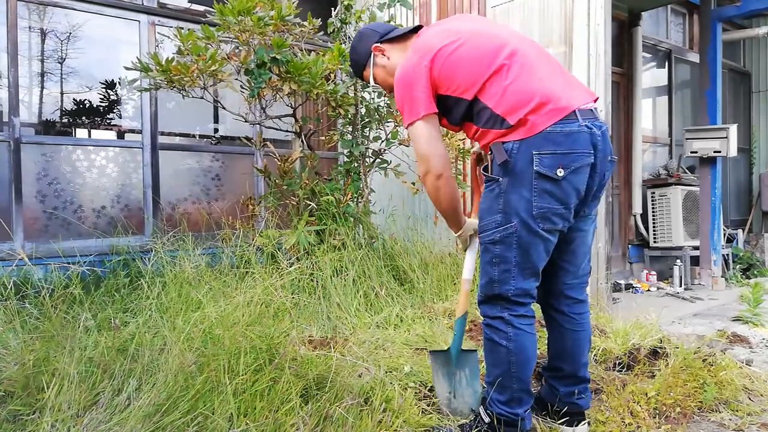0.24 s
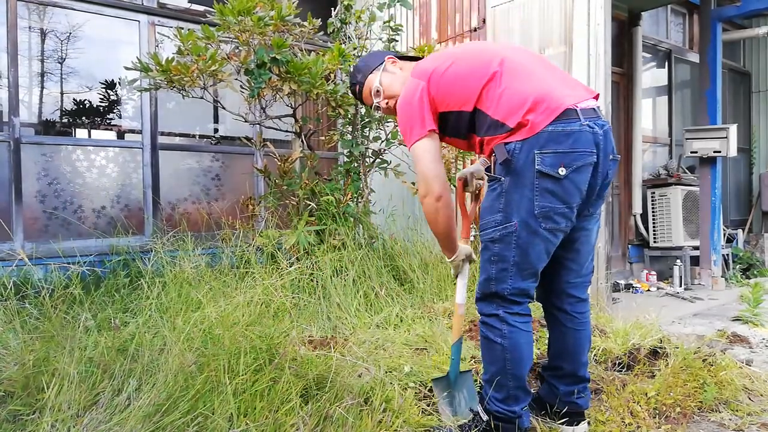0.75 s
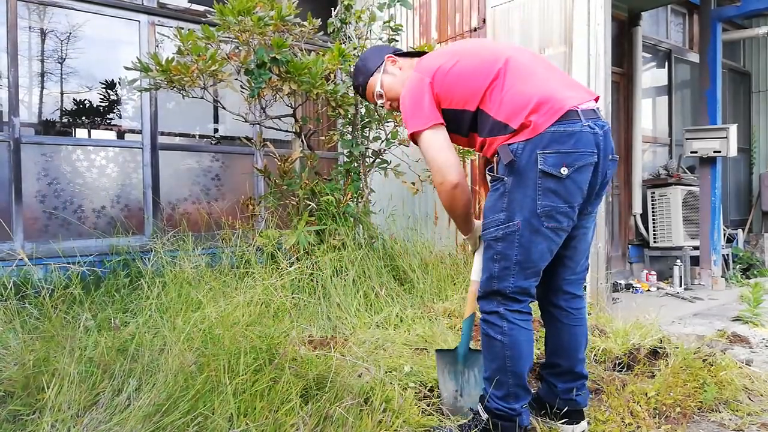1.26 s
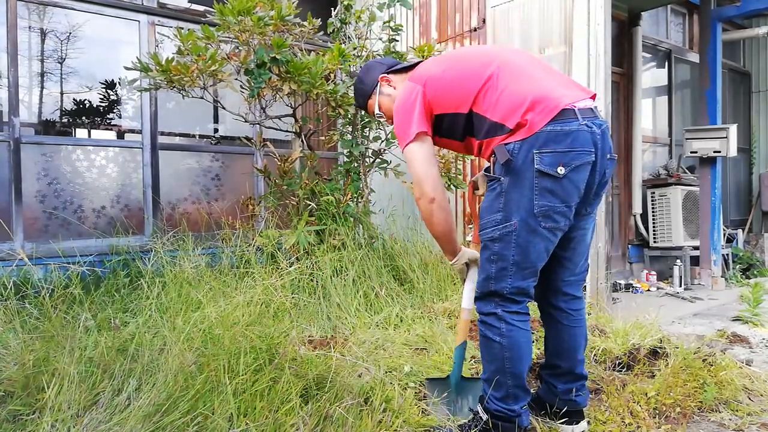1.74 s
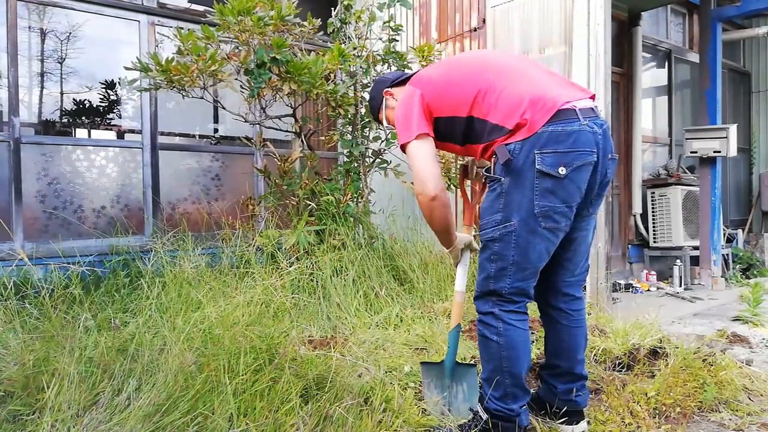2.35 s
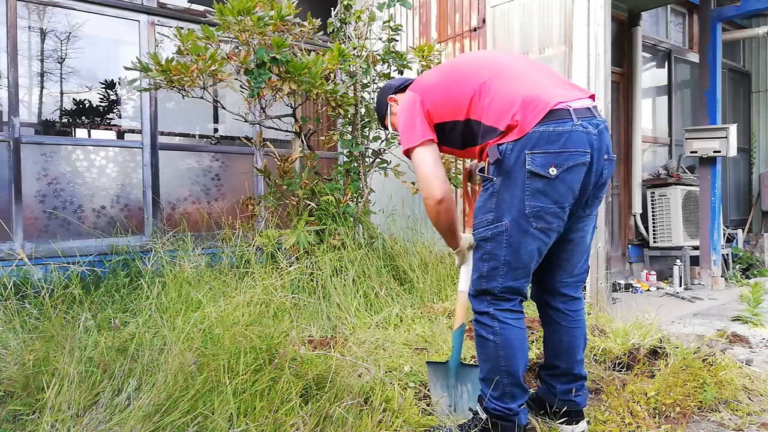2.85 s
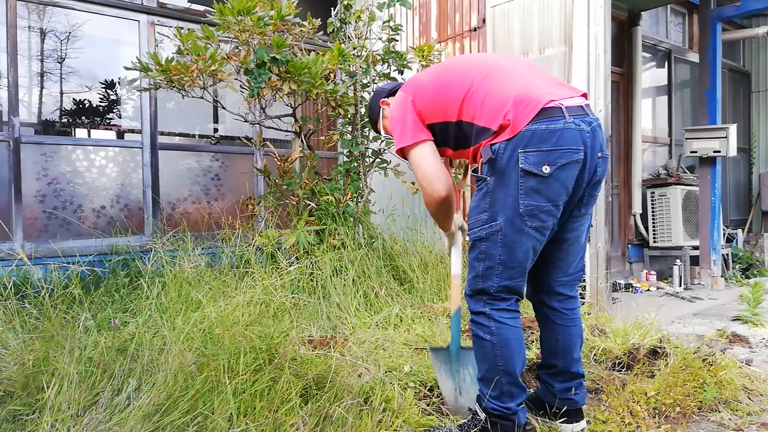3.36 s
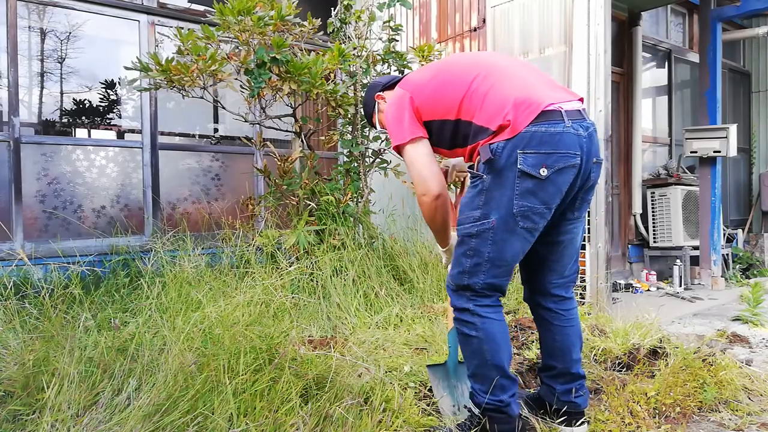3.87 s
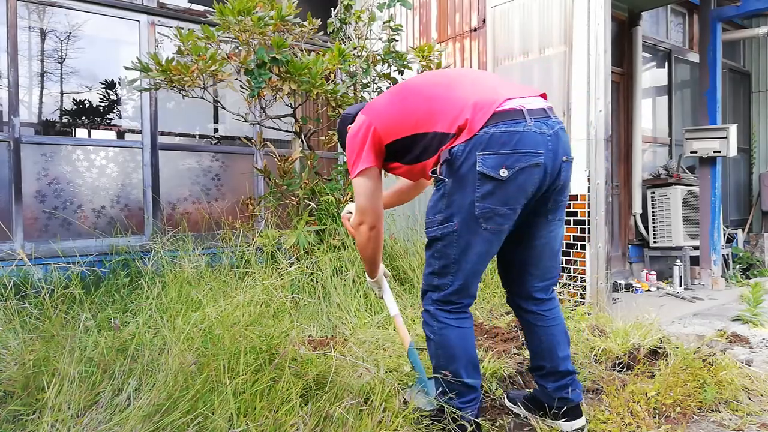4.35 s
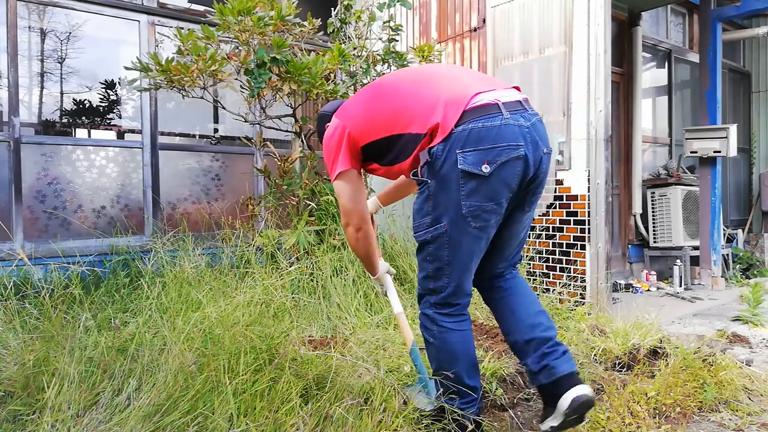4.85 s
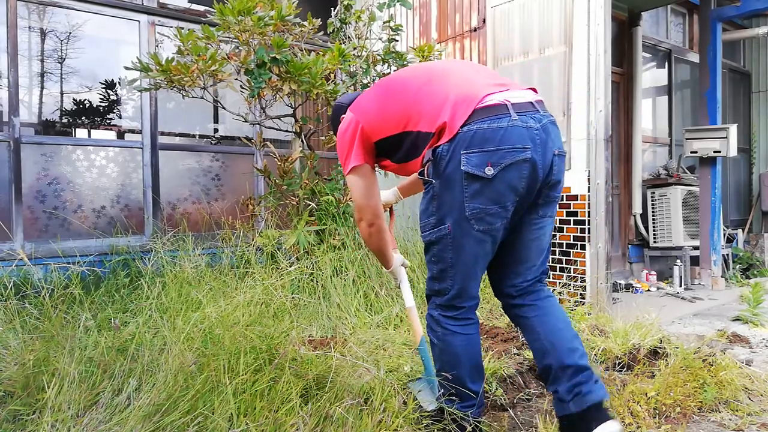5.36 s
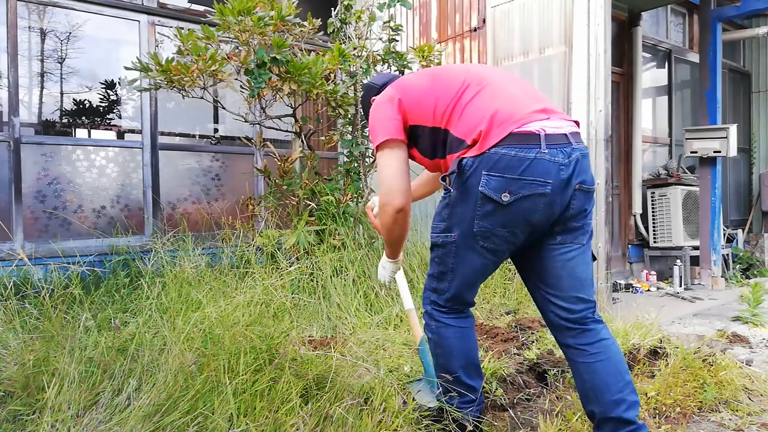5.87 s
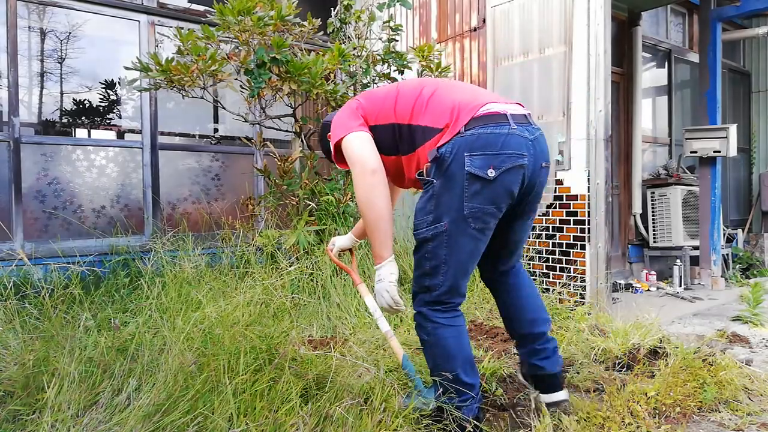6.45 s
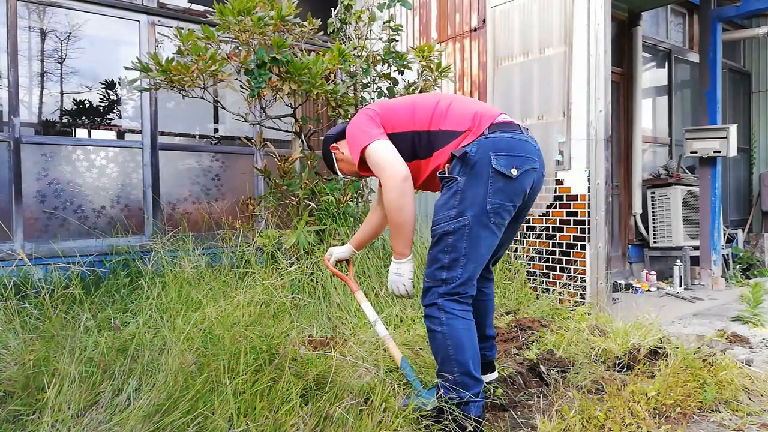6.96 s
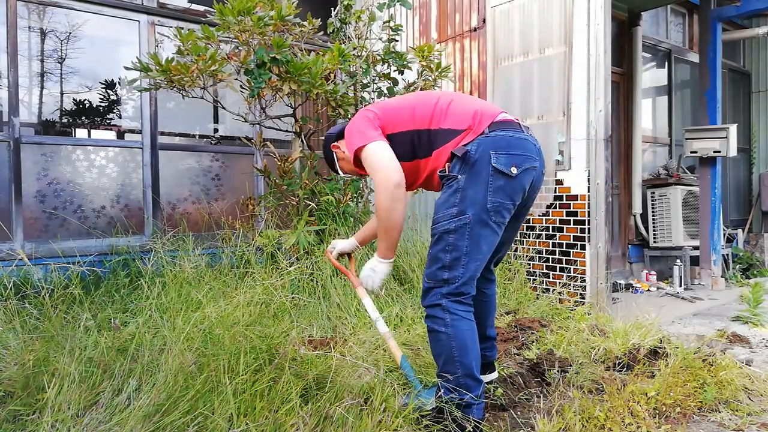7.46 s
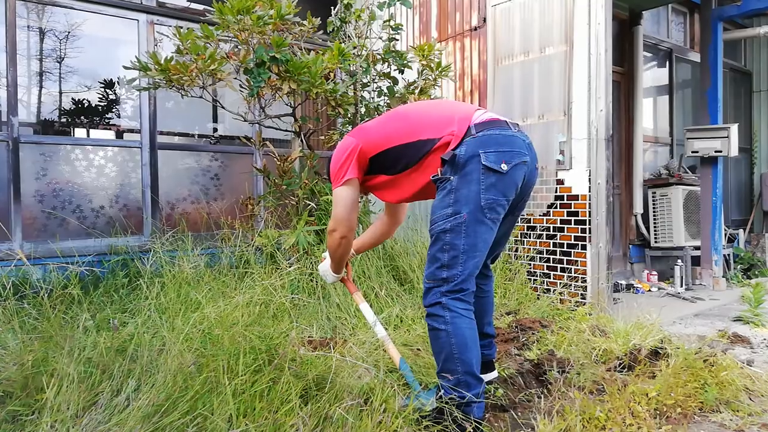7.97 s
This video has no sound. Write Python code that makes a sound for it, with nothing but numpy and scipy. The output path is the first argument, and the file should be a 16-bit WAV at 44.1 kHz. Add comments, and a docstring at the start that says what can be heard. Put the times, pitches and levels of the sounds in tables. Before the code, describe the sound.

A steel shovel digs in stony garden soil close by, with a short echo from house walls. It opens with a sharp clank, followed by a cluster of clinks at 0.6 seconds and light pebble ticks. A gritty scrape with strikes comes at 1.5, another clink at 2.2, and loud, briefly ringing clanks at 2.9 and 3.4. From 4 to about 7 seconds, grass and trousers rustle softly as feet shift on loose soil. A boot stamps the blade in at 5.1 and 5.5, each a dull thud with a crunch, and a rubber sole slips with a short rasp at 5.8. The wooden shaft knocks quietly now and then. Another sharp clank lands at 6.8, and a lighter scraping clink at 7.8. Throughout, crickets chirp quietly, one nearer and others distant, over faint outdoor air and a low machine hum.

```python
"""A steel shovel clanks and scrapes in stony garden soil: jabbed, levered, then stamped in twice by a boot.
The edge grinds on stones and the blade's modes ring briefly; the wooden shaft knocks dully.
Grass and trousers rustle, a rubber sole slips, and house walls answer with a short echo.
Crickets chirp with their wings over outdoor air and a low machine hum."""
import sys
import numpy as np
from scipy import signal
from scipy.fft import rfft, irfft, next_fast_len
from scipy.io import wavfile
from scipy.ndimage import map_coordinates

SR = 44100
rng = np.random.default_rng(int(sys.argv[2]) if len(sys.argv) > 2 else 0)


def to_wav(sig):
    """Store sig (one row per channel, or 1-D mono) as 16-bit WAV at the path in sys.argv[1].

    Samples outside -1..1 are clipped; the rate is SR.
    """
    pcm = np.clip(np.atleast_2d(sig), -1, 1) * 32767
    pcm = np.round(pcm).astype(np.int16)
    wavfile.write(sys.argv[1], SR, pcm.T)  # frames by channels


N = 362061

# Spectrum of grit on steel. Each row: frequency in Hz, level in dB.
GRIT_SPECTRUM = [(200, -21), (400, -14), (1000, -17), (2500, -7), (4500, -5.5), (6200, -9), (8600, -6.5),
                 (9900, -4), (10700, 4), (11600, -6), (12500, -9.5), (16000, -25)]
# Spectrum of crunching soil. Each row: frequency in Hz, level in dB.
SOIL_SPECTRUM = [(100, -41.5), (400, 3), (800, -2.5), (1400, -6), (2100, -9.5), (3500, -17.5),
                 (7000, -13.5), (16000, -61.5)]
# Boot on the blade's step. Each row: start in seconds, level in dB, relative soil crunch in dB.
BOOT_STAMPS = [(5.1387, -10, 6.5), (5.464, -7.5, 14)]


def amp(db):
    """Decibels to gain."""
    return 10 ** (np.asarray(db) / 20)


def unit_rms(x):
    """Scale to rms 1."""
    return x / np.sqrt(np.mean(x ** 2) + 1e-20)


def curve_at(points, hz):
    """Interpolate (Hz, value) points on a log axis."""
    point_hz, values = np.transpose(points)
    return np.interp(np.log(hz + 1), np.log(point_hz + 1), values)


def wobble(rate_hz):
    """Smooth random curve, rate_hz knots a second."""
    knots = rng.standard_normal(int(N * rate_hz / SR) + 4)
    return map_coordinates(knots, [np.arange(N) * rate_hz / SR])


def swell(peak_s, rise_s, fall_s, roundness=1):
    """Gain of 1 at peak_s, 20 dB lower rise_s before and fall_s after."""
    t = np.arange(N) / SR - peak_s
    return amp(-20 * np.minimum(np.maximum(-t / rise_s, t / fall_s), 10) ** roundness)


def damped(hz, t60_s, attack_s):
    """One decaying sine mode."""
    t = np.arange(SR // 2) / SR
    return amp(-60 * t / t60_s) * (1 - np.exp(-t / attack_s)) * np.sin(2 * np.pi * hz * t)


def add(track, start_s, sound):
    """Mix a sound into a track in place."""
    start = max(round(start_s * SR), 0)
    part = sound[..., :track.shape[-1] - start]
    track[..., start:start + part.shape[-1]] += part


def filtered(x, response):
    """FFT filter with gain response(Hz)."""
    n = x.shape[-1]
    size = next_fast_len(n + 8192)
    return irfft(rfft(x, size) * response(np.fft.rfftfreq(size, 1 / SR)), size)[..., :n]


def coloured(x, response_db, size=2048):
    """Minimum-phase filter with level response_db(Hz)."""
    cepstrum = irfft(np.log(amp(response_db(np.fft.rfftfreq(size, 1 / SR)))))
    cepstrum[1:size // 2] *= 2
    cepstrum[size // 2 + 1:] = 0
    impulse = irfft(np.exp(rfft(cepstrum)))
    return signal.fftconvolve(x, impulse[None], axes=1)[:, :x.shape[-1]]


def spread(pair):
    """Two unrelated signals become left and right, nearly mono in the bass."""
    # Stereo image. Each row: frequency in Hz, left-right correlation.
    correlation = [(150, 0.93), (300, 0.56), (500, 0.077), (1200, 0.083), (3000, 0.17), (12000, 0.12)]
    angle = lambda hz: np.arccos(np.clip(curve_at(correlation, hz), -1, 1)) / 2
    mid, side = filtered(pair, lambda hz: np.array([np.cos(angle(hz)), np.sin(angle(hz))]))
    return np.array([mid + side, mid - side])


def off_centre(x, lag_s=0.00003):
    """A source slightly to the right arrives later on the left."""
    return filtered(x, lambda hz: np.exp(-2j * np.pi * lag_s * np.outer([0.5, -0.5], hz)))


def grains(n, rate_hz, scatter_db):
    """Stereo friction noise: tiny slips of random size, rms 1."""
    knots = np.minimum(rng.standard_normal(int(n * rate_hz / SR) + 2), 2)
    sizes = amp(scatter_db * np.interp(np.arange(n) * rate_hz / SR, np.arange(len(knots)), knots))
    return unit_rms(spread(sizes * rng.standard_normal((2, n))))


def rush(spectrum, rate_hz, scatter_db):
    """Scene-long grainy noise with a (Hz, dB) spectrum, rms 1."""
    return unit_rms(filtered(grains(N, rate_hz, scatter_db), lambda hz: amp(curve_at(spectrum, hz))))


def crackle(rate_hz=70, scatter_db=4, t60_s=0.0065):
    """Sparse ticks of loose grit, rms 1."""
    ticks = (rng.random(N) < rate_hz / SR) * amp(scatter_db * np.minimum(rng.standard_normal(N), 1.5))
    t = np.arange(SR // 100) / SR
    envelope = signal.fftconvolve(ticks, amp(-60 * t / t60_s))[:N]
    bursts = envelope * spread(rng.standard_normal((2, N)))
    return unit_rms(filtered(bursts, lambda hz: amp(curve_at(GRIT_SPECTRUM, hz))))


def grind(rise_s, crumble_db, crumble_t60_s):
    """Contact force of unit energy: a burst of slips, then crumbling soil."""
    t = np.arange(SR // 2) / SR
    progress = t / rise_s
    burst = progress ** 2 * np.exp(2 - 2 * progress)
    crumble = amp(crumble_db - 60 * t / crumble_t60_s) * np.minimum(progress, 1)
    force = (burst + crumble) * grains(len(t), rate_hz=1300, scatter_db=4.5)
    return force / np.linalg.norm(force, axis=1, keepdims=True)


def wall_echo(x, wet_db, build_s=0.0028, late_db=-27, late_t60_s=0.66):
    """x plus the walls' answer: a short dense echo and a faint longer one."""
    # Decay of the short echo. Each row: frequency in Hz, t60 in seconds.
    early_t60 = [(150, 0.1), (500, 0.21), (2000, 0.23), (6000, 0.24), (11000, 0.14), (16000, 0.07)]
    hz, t, noise = signal.stft(spread(rng.standard_normal((2, SR // 2))), SR, nperseg=256)
    decay = amp(-60 * t / curve_at(early_t60, hz)[:, None]) + amp(late_db - 60 * t / late_t60_s)
    tail = signal.istft(noise * decay * (1 - np.exp(-t / build_s)), SR, nperseg=256)[1]
    tail *= amp(wet_db) / np.linalg.norm(tail[0])
    return x + signal.fftconvolve(x, tail, axes=1)[:, :x.shape[1]]


def outdoor_air():
    """Faint, bass-heavy noise."""
    # Air spectrum. Each row: frequency in Hz, level in dB.
    spectrum = [(12, -33), (20, -3), (107, -1), (248, -9.5), (301, -15), (499, -22), (678, -20.5),
                (976, -24.5), (1220, -23.5), (4060, -31), (4670, -28), (5850, -34.5), (10800, -32.5),
                (14700, -40), (16000, -49)]
    return amp(-54) * rush(spectrum, rate_hz=14, scatter_db=1.5)


def machine_hum(low_db=-59, swell_s=0.12):
    """Four wavering hum lines; the low pair swells briefly, the upper pair drifts in level."""
    # Hum lines. Each row: frequency in Hz, relative level in dB.
    partials = [(91, 1), (127, -8.5), (184, 1.5), (252, -9)]
    # Swells of the low pair. Each row: peak time in seconds, level in dB.
    low_swells = [(5.91, -50), (6.35, -56)]
    # Envelope of the upper pair. Each row: time in seconds, level in dB.
    upper_levels = [(0, -60), (.5, -56.5), (.8, -68.5), (4, -64.5), (4.5, -59), (5.1, -64.5), (6.35, -54),
                    (7.2, -66.5), (8.2, -64.5)]
    t = np.arange(N) / SR
    low = amp(low_db) + sum(amp(db) * swell(s, swell_s, swell_s, roundness=2) for s, db in low_swells)
    upper = amp(np.interp(t, *np.transpose(upper_levels)))
    lines = [amp(db + 2 * wobble(1.2)) * np.sin(2 * np.pi * hz * t + 0.8 * wobble(4.9))
             for hz, db in partials]
    return amp(2) * (low * (lines[0] + lines[1]) + upper * (lines[2] + lines[3]))


def trill_band(trills, hz, width_hz, stroke_hz, ramp_s=0.0067):
    """Distant trills, blurred into a narrow pulsing band of noise."""
    t = np.arange(N) / SR
    gate = sum(amp(db) * np.clip(np.minimum(t - start_s, end_s - t) / ramp_s, 0, 1)
               for start_s, end_s, db in trills)
    strokes = 1 + 0.64 * np.sin(2 * np.pi * stroke_hz * t + 2.2 * wobble(6.5))
    band = filtered(rng.standard_normal((2, N)), lambda f: 1 / (1 + ((f - hz) / width_hz) ** 4))
    return wall_echo(gate * strokes * unit_rms(band), wet_db=-6.5)


def far_crickets(first_s=0.31, period_s=0.333, length_s=0.125, level_db=-68, rest_s=2.2, resume_s=3.2):
    """One cricket trills like clockwork, with one rest; a lower voice joins three times."""
    # Trills of the lower voice. Each row: start in seconds, end in seconds, level in dB.
    low_trills = [(.7, 1.12, -71.5), (4.3, 5.15, -68.5), (6.2, 6.3, -63)]
    starts_s = np.arange(first_s, N / SR, period_s)
    high_trills = [(s, s + length_s, level_db) for s in starts_s if not rest_s < s < resume_s]
    high = trill_band(high_trills, hz=4663, width_hz=150, stroke_hz=44)
    return high + trill_band(low_trills, hz=3650, width_hz=250, stroke_hz=26)


def near_cricket(hz=4600, pitch_drop=0.065, width_s=0.0025, stroke_hz=36):
    """Each wing stroke is a short, slightly rough falling note; strokes grow louder through a chirp."""
    # Each row: first and last stroke in seconds, level of the last in dB, growth in dB per second.
    chirps = [(0.502, 0.587, -39, 178), (2.473, 2.527, -43, 18), (2.779, 2.834, -45, 47),
              (3.326, 3.406, -47, 107), (5.024, 5.124, -43.5, 146), (6.673, 6.753, -45, 120),
              (7.955, 8.031, -41.5, 202)]
    out, t = np.zeros(N), np.arange(-SR // 50, SR // 50) / SR
    for first_s, last_s, last_db, db_per_s in chirps:
        for s in np.linspace(first_s, last_s, 1 + round((last_s - first_s) * stroke_hz)):
            roughness = 0.05 * np.cumsum(rng.standard_normal(len(t)))
            phase = 2 * np.pi * hz * (t - pitch_drop * t ** 2 / (8 * width_s)) + roughness
            note = np.exp(-0.5 * (t / width_s) ** 2) * (np.sin(phase) + amp(-17.5) * np.sin(2 * phase))
            start_s = s + t[0] + rng.normal(0, 0.00063)
            db = last_db - db_per_s * (last_s - s) + rng.normal(0, 1.9)
            add(out, start_s, amp(db) * note)
    return wall_echo(np.array([out, out]), wet_db=-12.5)


def leg_rustle(flutter_db=0.9, trouser_db=-34.5, trouser_s=0.026):
    """Legs brush grass while feet shift on loose soil; the trousers swish with each stamp."""
    # Each row: peak time in seconds, swish and soil crunch in dB, rise and fall in seconds.
    leg_moves = [(4.05, -38.5, -64.5, 0.13, .13), (4.13, -44.5, -54.5, 0.11, 0.03),
                 (4.3, -46, -57.5, 0.19, 0.075), (4.48, -57, -58.5, 0.15, 0.14),
                 (4.68, -63.5, -56, 0.061, 0.17), (4.88, -57, -68, .15, 0.14),
                 (5.23, -49.5, -76, 0.2, 0.15), (5.325, -56, -48, 0.01, 0.031),
                 (5.57, -52, -66, 0.21, 0.15), (5.74, -45.5, -60.5, 0.12, 0.11),
                 (6.14, -62.5, -56.5, 0.19, 0.27), (6.42, -44.5, -64.5, 0.15, 0.1),
                 (6.51, -53, -64.5, .05, 0.16), (6.72, -59.5, -58.5, 0.092, 0.069)]
    # Spectrum of grass and cloth. Each row: frequency in Hz, level in dB.
    swish_spectrum = [(1180, -35.5), (2000, -13), (2810, -23.5), (3400, -15), (6760, -14), (9330, -4.5),
                      (10700, -2.5), (12300, -5.5), (16000, -21)]
    swish = sum(amp(trouser_db) * swell(s, trouser_s, trouser_s) for s, _, _ in BOOT_STAMPS)
    crunch = np.zeros(N)
    for peak_s, swish_db, crunch_db, rise_s, fall_s in leg_moves:
        move = swell(peak_s, rise_s, fall_s, roundness=1.13)
        swish += amp(swish_db) * move
        crunch += amp(crunch_db) * move
    brushing = amp(flutter_db * wobble(45)) * swish * rush(swish_spectrum, rate_hz=610, scatter_db=3)
    soil = crunch * (amp(-3) * rush(SOIL_SPECTRUM, rate_hz=220, scatter_db=4.5) + amp(0.5) * crackle())
    return wall_echo(brushing + soil, wet_db=-6.5)


def sole_slips():
    """Rubber catches on the soil and lets go with a short rasp."""
    # Each row: time in seconds, level in dB.
    slips = [(5.772, -42.5), (5.784, -40.5), (5.802, -39)]
    spectrum = [(500, -25), (1100, -3), (2100, 0), (3300, -20), (8000, -35)]
    out = np.zeros((2, N))
    for s, db in slips:
        force = grind(0.0024, crumble_db=-15, crumble_t60_s=0.061)
        add(out, s - 0.002, amp(db + 31) * coloured(force, lambda hz: curve_at(spectrum, hz)))
    return wall_echo(out, wet_db=-9.5)


def shaft_knocks():
    """The levered wooden shaft bumps with one damped note."""
    # Each row: start in seconds, level in dB, pitch in Hz.
    knocks = [(1.819, -50, 470), (4.653, -48.5, 334), (5.326, -48, 445), (5.355, -46, 398),
              (6.135, -50, 370), (7.377, -43, 396), (7.405, -51.5, 420)]
    out = np.zeros((2, N))
    for start_s, db, hz in knocks:
        add(out, start_s, amp(db + 7) * damped(hz, t60_s=0.068, attack_s=0.0031))
    return wall_echo(out, wet_db=-5)


def blade_ring(force, ring_db, max_t60_s, favoured_hz=0, favour_db=7):
    """A force drives the blade's modes; the contact point favours some, the soil's grip caps t60."""
    # Blade modes. Each row: frequency in Hz, level in dB, t60 in seconds.
    modes = [(476, -19, 0.14), (895, -13, 0.22), (1431, -1.5, 0.45), (1516, -7, .18), (2000, -17.5, .15),
             (2900, -4, 0.3), (3516, 6, 0.084), (4500, -2.5, 0.11), (4790, 1, 0.11), (5530, -7, 0.12),
             (7060, -4.5, .12), (8800, -4.5, 0.12), (10800, -4.5, .12), (10240, -5, .13)]
    t = np.arange(SR // 2) / SR
    hz, db, t60_s = np.transpose(modes)[:, :, None]
    boost_db = favour_db * np.exp(-(10 * (favoured_hz / hz - 1)) ** 2)
    level_jitter, pitch_jitter = rng.standard_normal((2, len(modes), 1))
    phase = rng.uniform(0, 2 * np.pi, (len(modes), 1)) + 0.57 * rng.standard_normal((2, len(modes), 1))
    envelopes = amp(db + boost_db + 2 * level_jitter - 60 * t / np.minimum(t60_s, max_t60_s))
    tones = envelopes * np.sin(2 * np.pi * hz * (1 + 0.001 * pitch_jitter) * t + phase)
    return signal.fftconvolve(force, amp(ring_db) * tones.sum(axis=1), axes=1)[:, :force.shape[1]]


def pebble_ticks():
    """Small stones tick on the blade: light, very short contacts, mostly treble."""
    # Each row: time in seconds, level in dB, relative rasp in dB.
    pebbles = [(0.6459, -26, -28.5), (0.7434, -31.5, -35), (0.802, -25.5, -32), (0.834, -33, -21),
               (0.8606, -33.5, -22), (0.919, -41, -39), (1.1233, -37, -31), (1.2095, -22.5, -35),
               (1.2472, -27, -12), (1.3692, -39.5, -6), (1.69, -33, -28), (1.8591, -43.5, -3.5),
               (4.1952, -24, -21.5), (4.6538, -37, 1.5), (5.3203, -33, -12), (5.9823, -38, -13.5),
               (6.2297, -41.5, -3.5), (6.986, -34.5, -12.5), (7.3886, -36.5, -16), (7.51, -40.5, -12),
               (8.0532, -30.5, -17.5)]
    out = np.zeros((2, N))
    for s, db, rasp_db in pebbles:
        force = grind(0.0018, crumble_db=-12, crumble_t60_s=0.13)
        tilt = [(4000, rasp_db + 13), (9000, 0.0056)]
        tick = amp(db + 22) * coloured(force, lambda hz: curve_at(GRIT_SPECTRUM, hz) + curve_at(tilt, hz))
        ring = blade_ring(tick, ring_db=-57, max_t60_s=0.23)
        add(out, s - 0.0002, wall_echo(tick + ring, wet_db=-3.5))
    return out


def blade_scrapes():
    """Grit drags along the blade and keeps its modes singing."""
    # Each row: peak time in seconds, level in dB, rise and fall in seconds, freedom to ring in dB.
    scrapes = [(.31, -59.5, .05, .1, 18), (.8, -52.5, 0.055, 0.083, -12), (1.15, -53.5, 0.053, 0.042, 8),
               (1.216, -39.5, 0.056, 0.085, 3.5), (1.4, -64, .08, 0.024, 17), (1.55, -26, 0.058, 0.084, -2),
               (1.62, -27.5, .03, 0.032, -26), (1.905, -49.5, .08, 0.053, 3.5), (2.158, -49, .03, 0.039, 4),
               (2.59, -57, 0.089, .03, 1.5), (3.188, -52, 0.06, 0.024, 1.5), (7.388, -52, 0.056, 0.086, -3),
               (7.824, -32.5, 0.027, 0.054, -14)]
    pressure, shaking = np.zeros((2, N))
    for peak_s, db, rise_s, fall_s, free_db in scrapes:
        stroke = amp(db) * swell(peak_s, rise_s, fall_s)
        pressure += stroke
        shaking += amp(free_db) * stroke
    drag = pressure * (rush(GRIT_SPECTRUM, rate_hz=360, scatter_db=4) + amp(-8) * crackle(rate_hz=110))
    # Coarser stones shake the low modes, most where the soil holds the blade least.
    stone_spectrum = [(500, -20), (1400, 1.5), (3000, -3), (5000, -7.5), (11000, -4.5), (16000, -29.5)]
    force = shaking * rush(stone_spectrum, rate_hz=190, scatter_db=11.5)
    ring = blade_ring(force, ring_db=-50, max_t60_s=0.53)
    return amp(-1) * wall_echo(drag + ring, wet_db=-9.5)


def boot_stamps(push_hz=205, push_width_s=0.0019, push_delay_s=0.00524, shaft_hz=262, low_cut_hz=65):
    """The sole drives the blade in with one low push; the shaft shudders and soil crunches."""
    out, t = np.zeros((2, N)), np.arange(SR // 2) / SR
    from_peak_s = t - push_delay_s
    envelope = np.exp(-0.5 * (from_peak_s / push_width_s) ** 2) * (1 - np.exp(-t / 0.0017))
    push = -envelope * np.cos(2 * np.pi * push_hz * from_peak_s + 0.5)
    shudder = amp(-7) * damped(shaft_hz, t60_s=0.096, attack_s=0.016)
    for start_s, db, crunch_db in BOOT_STAMPS:
        force = grind(0.0028, crumble_db=-11, crumble_t60_s=0.11)
        crunch = amp(crunch_db) * coloured(force, lambda hz: curve_at(SOIL_SPECTRUM, hz))
        add(out, start_s, amp(db) * wall_echo(push + shudder + crunch, wet_db=-6))
    # The stamps carry no deep bass: everything below about 65 Hz is cut away.
    return filtered(out, lambda hz: hz ** 3 / (hz ** 3 + low_cut_hz ** 3))


def contact_notes(knock_hz, clank_hz):
    """Blade and stone, pressed together, sound two heavily damped groups of notes."""
    knock = damped(knock_hz, t60_s=0.047, attack_s=0.0016)
    knock += amp(-1) * damped(1.432 * knock_hz, t60_s=0.021, attack_s=0.0022)
    knock += amp(-11.5) * damped(2.5 * knock_hz, t60_s=0.072, attack_s=0.003)
    clank = damped(clank_hz, t60_s=0.04, attack_s=0.00057)
    clank += amp(-7) * damped(1.16 * clank_hz, t60_s=0.029, attack_s=0.0011)
    return knock, clank


def stone_strikes(cut_s=0.012, cut_db=-31, cut_rise_s=0.0017):
    """The edge cuts soil for an instant, then grinds on a stone that knocks and clanks; the blade rings."""
    # Each row: time in seconds, level in dB, relative knock, clank, rasp and edge in dB,
    # knock, clank and favoured ring frequencies in Hz.
    strikes = [(.017, -4.5, -19.5, -16, -17.5, -11.5, 306, 1450, 3465),
               (.607, -18, -23.5, -21.5, -12.5, -9.5, 312, 2260, 10800),
               (.618, -17, -25.5, -18.5, -15.5, -9.5, 292, 2230, 10900),
               (.637, -20, -17.5, -21, -14.5, -9, 446, 1390, 10900),
               (1.542, -14, -26, -30, -12, -12.5, 298, 2090, 4500),
               (1.558, -14.5, -21.5, -17.5, -14.5, -18, 333, 1920, 10800),
               (1.617, -25.5, -13, -11.5, -9, -10, 433, 1490, 4500),
               (2.166, -14, -41, -21.5, -13, -11, 423, 1990, 1438),
               (2.171, -14.5, -24, -21, -15.5, -7.5, 263, 1427, 10800),
               (2.855, -3.5, -16.5, -15, -15.5, -13.5, 292.5, 1558, 4770),
               (3.426, -5.5, -20.5, -19, -17, -11.5, 464, 2053, 2900),
               (3.43, -3, -24, -26.5, -26, -16.5, 314, 1440, 2900),
               (3.463, -13.5, -13, -15.5, -19, -16, 412, 1480, 2900),
               (6.786, -5, -21, -24.5, -11.5, -10.5, 342, 2200, 890),
               (6.806, -10, -22, -25.5, -17.5, -11.5, 359, 1587, 4770),
               (7.816, -28, -25, -25, -24.5, -6.5, 256, 2200, 10900),
               (7.822, -23, -16.5, -19, -29.5, -10, 388, 2165, 10800)]
    # Spectrum of steel on stone. Each row: frequency in Hz, level in dB.
    contact = [(60, -20.5), (190, -1), (290, 10), (480, 10), (660, -3), (830, -2.5), (1030, 2.5), (1600, 5),
               (2400, 3.5), (4500, 5), (5600, 0.5), (8500, 0), (10600, 9), (12500, -2.5), (16000, -18.5)]
    # The flat blade beams its treble unevenly. Each row: frequency in Hz, left minus right in dB.
    beam = [(300, 0), (1500, -1), (4200, -4), (5500, -2.5), (7500, 4.5), (10400, 5.5), (11800, -2.5)]
    out, cut_n = np.zeros((2, N)), round(cut_s * SR)
    cut_envelope = np.exp((np.arange(cut_n) - cut_n) / SR / cut_rise_s)
    for s, db, knock_db, clank_db, rasp_db, edge_db, knock_hz, clank_hz, ring_hz in strikes:
        force = np.pad(grind(0.0029, crumble_db=-5.5, crumble_t60_s=0.14), ((0, 0), (cut_n, 0)))
        add(force, 0.0015, amp(cut_db) * cut_envelope * grains(cut_n, rate_hz=2200, scatter_db=2))
        bands = [(450, knock_db), (1200, clank_db), (2100, clank_db),
                 (3000, rasp_db), (5200, rasp_db), (7500, edge_db)]
        blow = amp(db + 28) * coloured(force, lambda hz: curve_at(contact, hz) + curve_at(bands, hz))
        blow += blade_ring(blow, ring_db=-51, max_t60_s=0.33, favoured_hz=ring_hz)
        knock, clank = contact_notes(knock_hz, clank_hz)
        add(blow, cut_s + 0.002, amp(db + knock_db + 4) * knock + amp(db + clank_db + 3.5) * clank)
        add(out, s - cut_s - 0.0012, wall_echo(blow, wet_db=-6))
    return filtered(out, lambda hz: amp(np.outer([0.5, -0.5], curve_at(beam, hz))))


def scene():
    """Shovel, digger, crickets, hum and air in stereo."""
    crickets = near_cricket() + far_crickets()
    shovel = stone_strikes() + pebble_ticks() + blade_scrapes() + boot_stamps() + shaft_knocks()
    return off_centre(shovel) + leg_rustle() + sole_slips() + crickets + machine_hum() + outdoor_air()


def record(dry, ceiling=0.88, top_hz=16050):
    """Round off the tallest peaks, then cut everything above top_hz."""
    rounded = dry / (1 + (dry / ceiling) ** 6) ** (1 / 6)
    return filtered(rounded, lambda hz: hz < top_hz)


dry = scene()
out = record(dry)
to_wav(out)
```